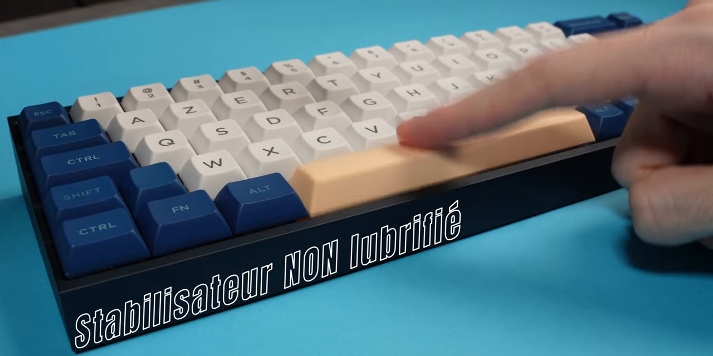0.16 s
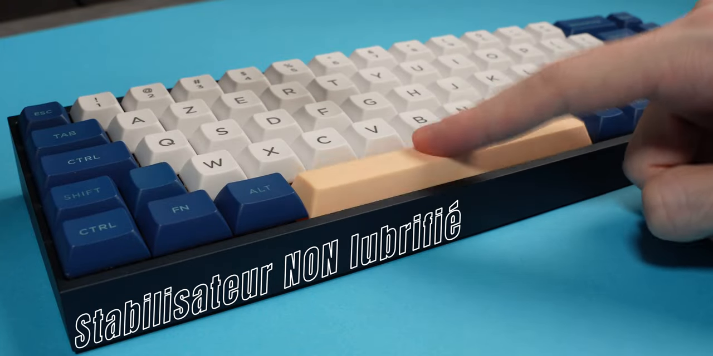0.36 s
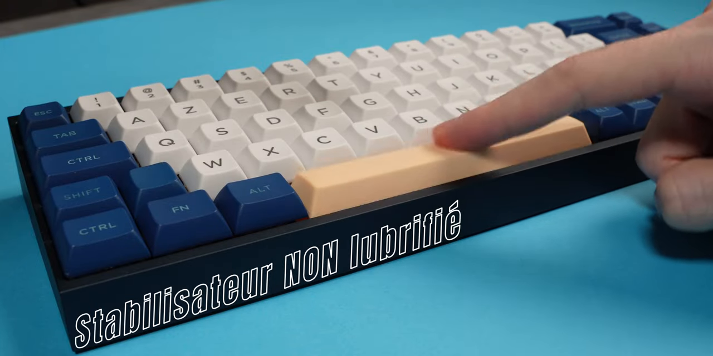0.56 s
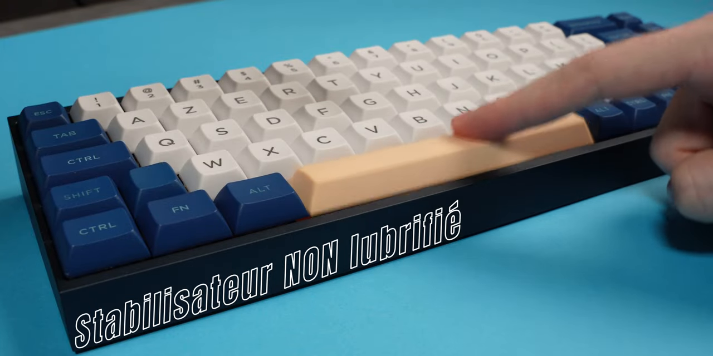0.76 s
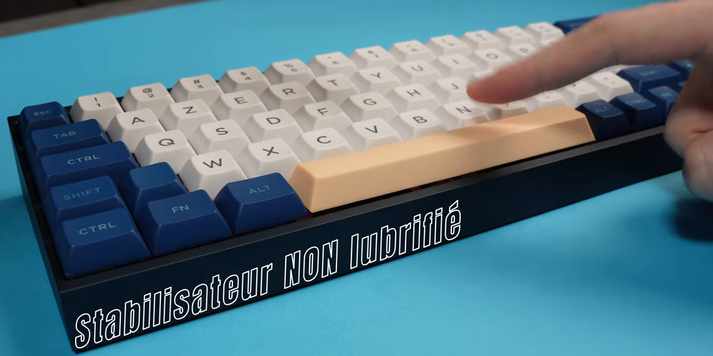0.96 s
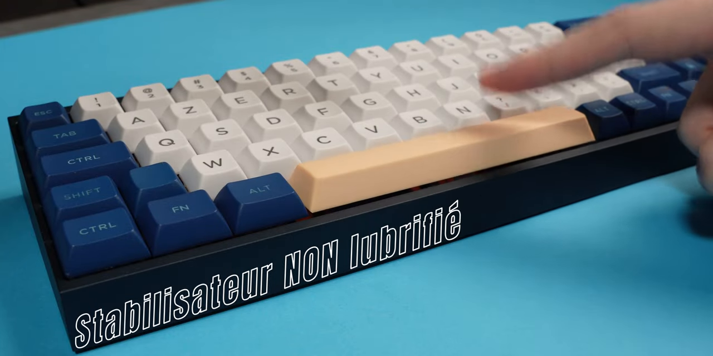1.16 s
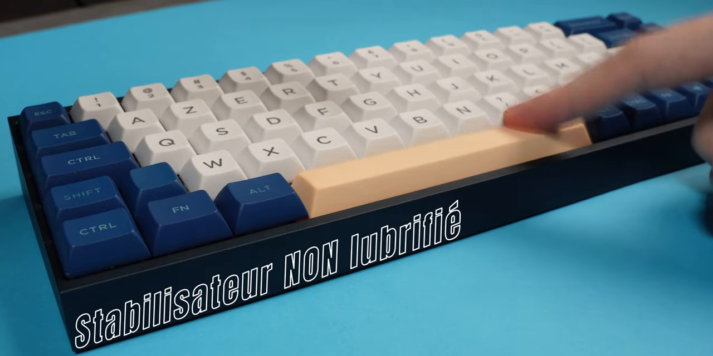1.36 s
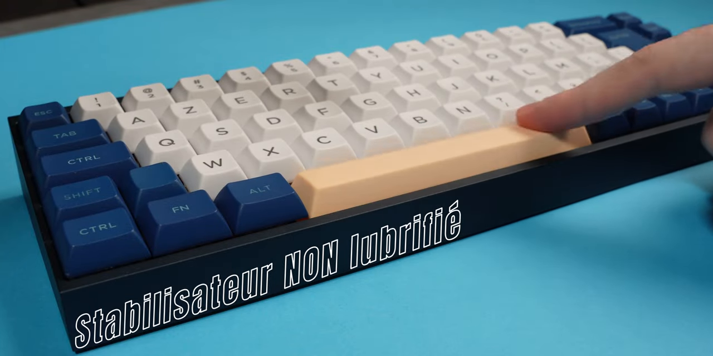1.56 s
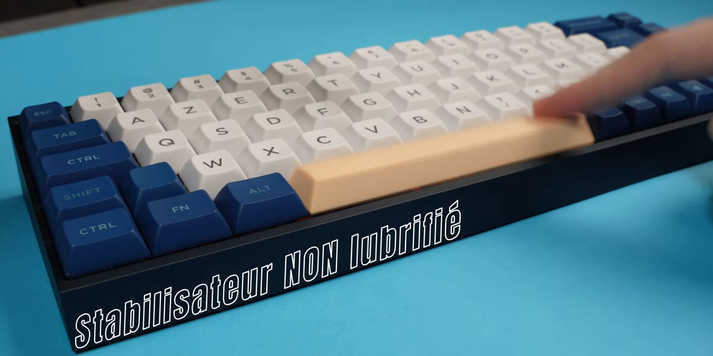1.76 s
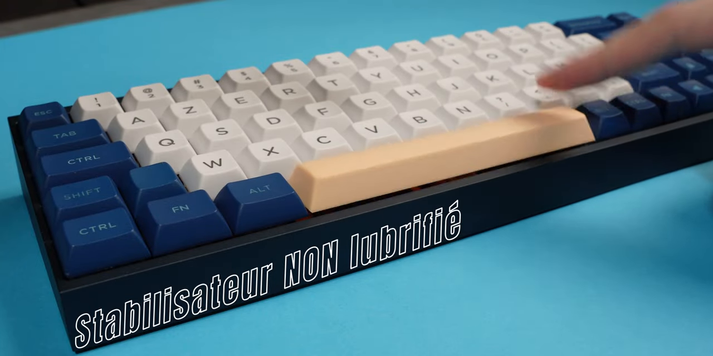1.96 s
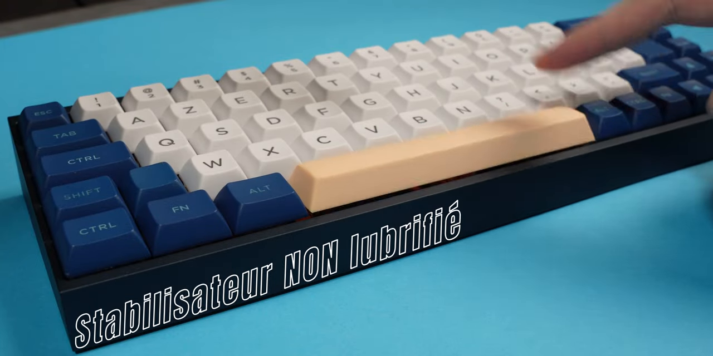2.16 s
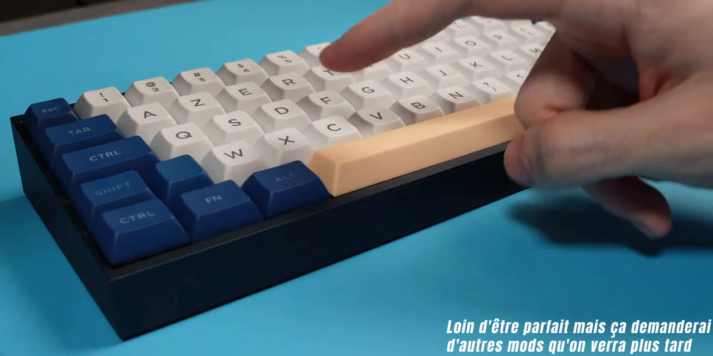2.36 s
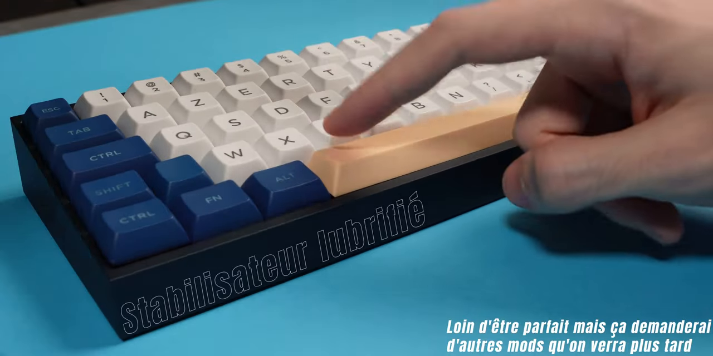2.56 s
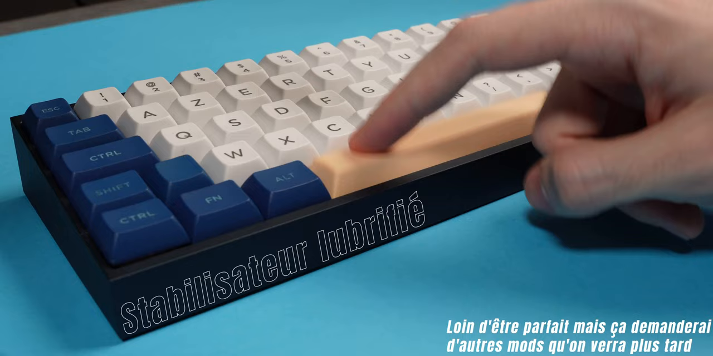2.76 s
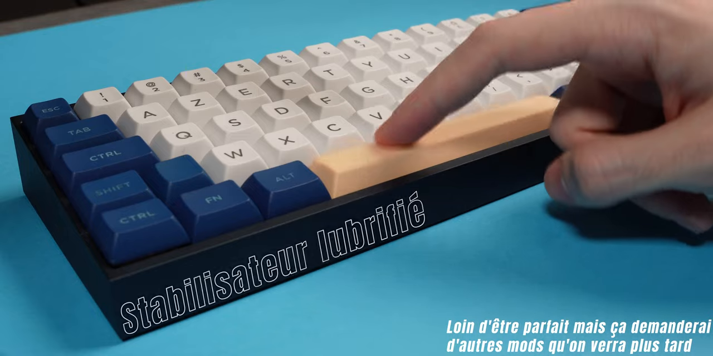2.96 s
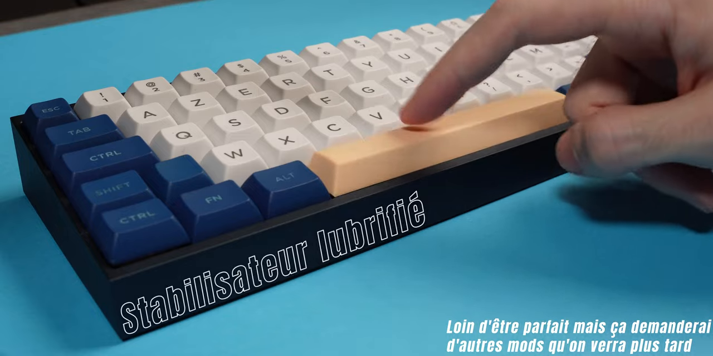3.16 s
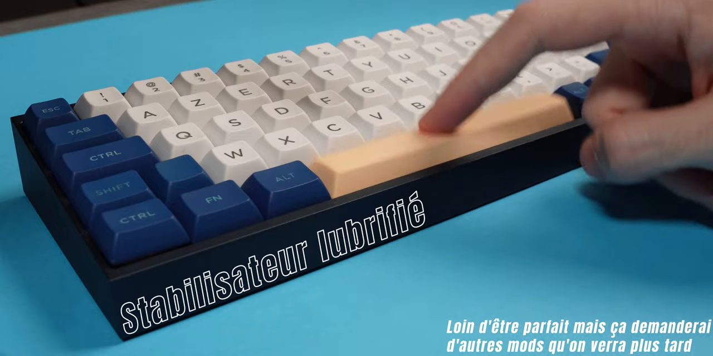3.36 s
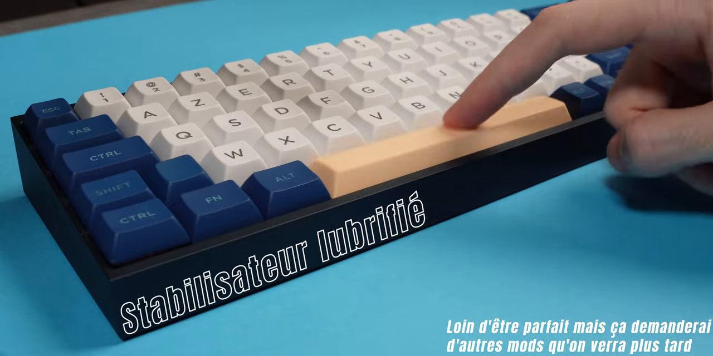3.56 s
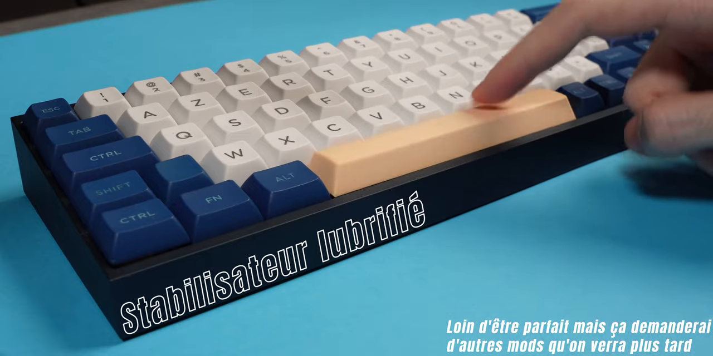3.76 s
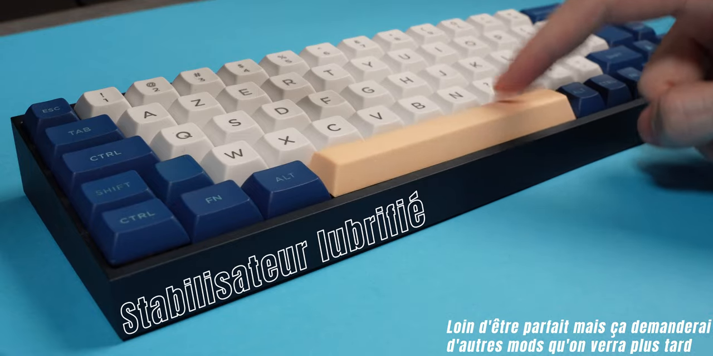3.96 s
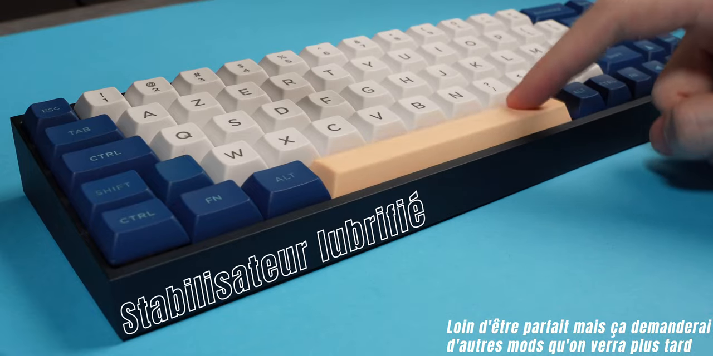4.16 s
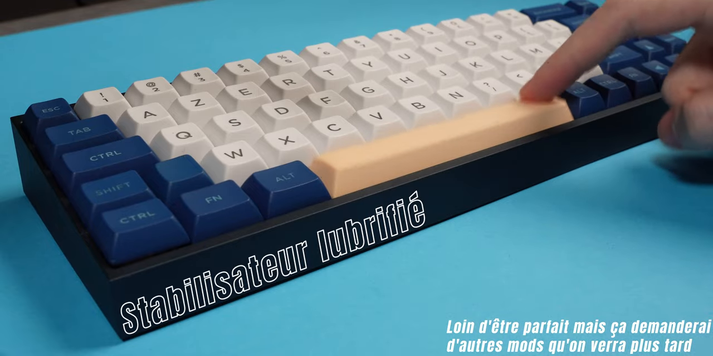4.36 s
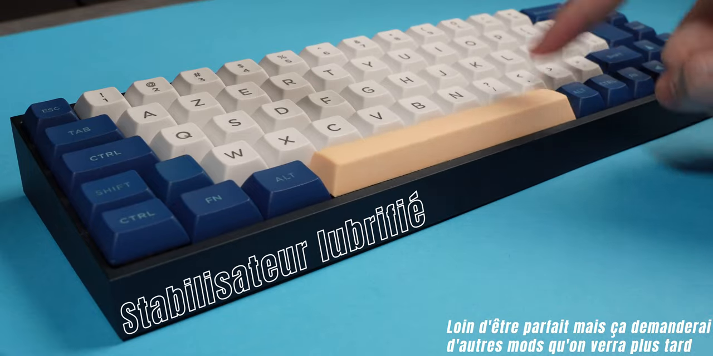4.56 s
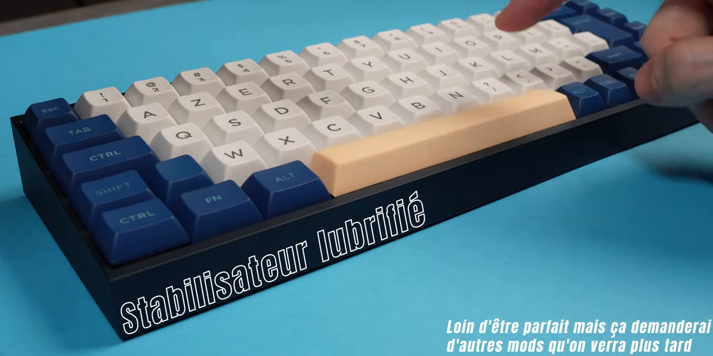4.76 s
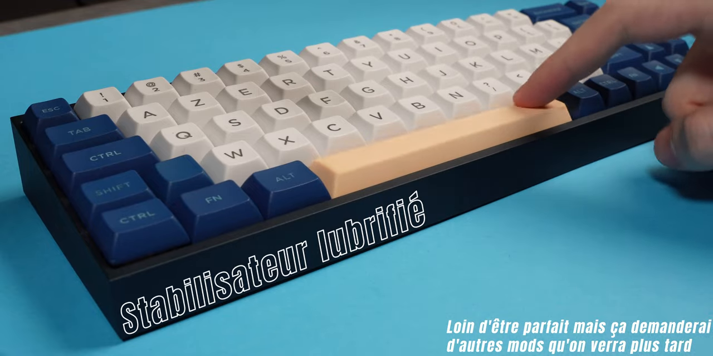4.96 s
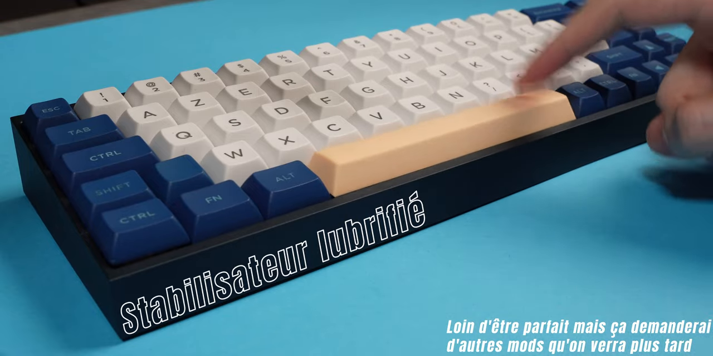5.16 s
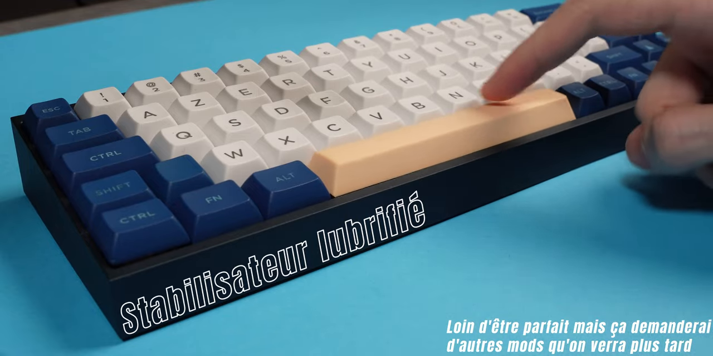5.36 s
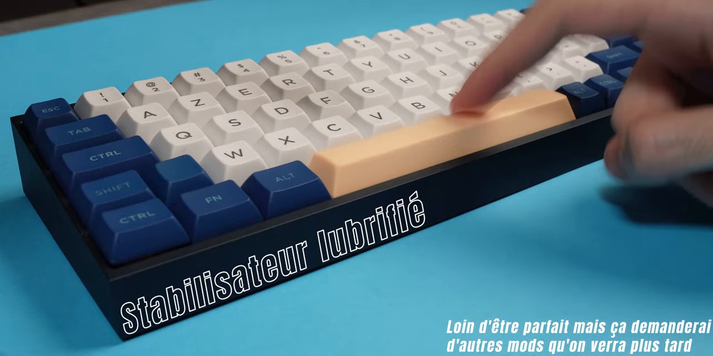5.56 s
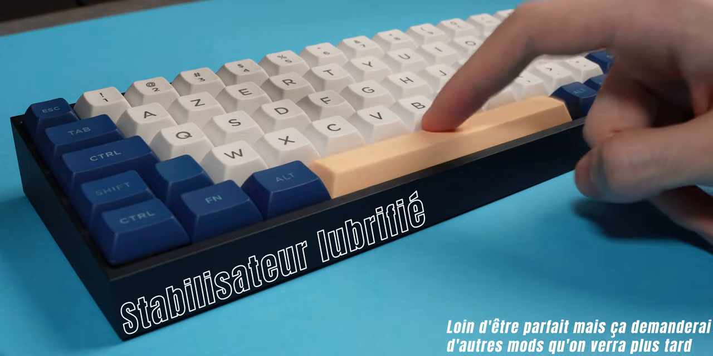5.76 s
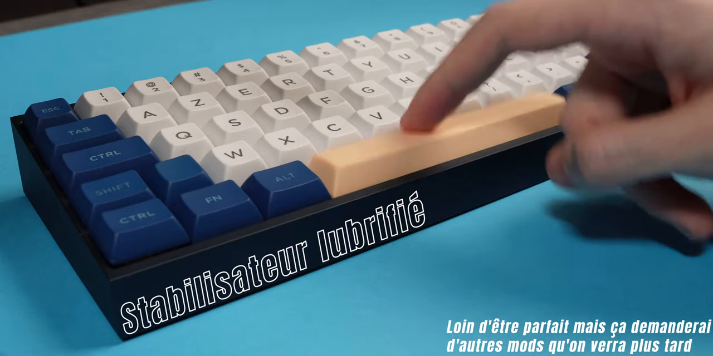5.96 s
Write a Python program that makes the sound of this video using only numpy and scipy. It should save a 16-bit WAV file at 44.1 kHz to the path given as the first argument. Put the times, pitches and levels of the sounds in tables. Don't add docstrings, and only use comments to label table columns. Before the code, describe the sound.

Close microphone in a small quiet room: one finger repeatedly taps the long space bar of a mechanical keyboard on a desk. Each stroke is a knock at the bottom and a clack on the way back. The first run has a dry metallic rattle from a loose wire; after a brief pause, a second run sounds softer and rounder, with a tiny rebound tick. One short rest interrupts it.

```python
import sys
import numpy as np
from scipy import signal
from scipy.fft import rfft, irfft
from scipy.io import wavfile

SR = 44100
rng = np.random.default_rng(int(sys.argv[2]) if len(sys.argv) > 2 else 0)


def materialize(psi):
    bounded = np.clip(np.atleast_2d(psi).T, -1, 1)
    quanta = np.round(bounded * 32767).astype(np.int16)
    wavfile.write(sys.argv[1], SR, quanta)


def to_linear_factor(level_db):
    exponent = np.asarray(level_db, float) / 20
    return 10 ** exponent


N = 265482

GREASED_FROM_S = 2.4

# f/Hz, level/dB per Hz
ROOM_TONE = [(53, -22.5), (90, -2), (185, -11), (211, -14), (245, -13.5), (333, -16), (655, -22.5),
             (1060, -32), (2820, -39), (15100, -52.5), (16500, -61.5)]
# t/s, level/dB
DESK_JOLTS = [
    (0.0, -41),
    (0.18, -44.5),
    (0.86, -46),
    (1.851, -45.5),
    (2.441, -42.5),
    (3.44, -45),
    (4.43, -51),
    (5.45, -39.5),
]
# t/s, length/ms, level/dB, swell/dB
BAND_NOISES = [
    (0.0, 23.2, -34.5, -16.5),
    (0.142, 32, -67, -1),
    (1.017, 28.0, -53, -12.5),
    (1.527, 26.0, -54.5, -11.5),
    (3.163, 35, -58, 24.5),
]
# f/Hz, level/dB
BAND_NOISE_ZONES = [
    [(1250, 4), (2100, 5), (3000, -7.5), (3900, 1), (4650, -12.5), (5700, -2.5), (6600, -7.5),
     (10900, -5.5), (12900, -12)],
    [(2300, 14.5), (4000, 13), (5300, -1), (6700, -14.5), (10700, -14.5)],
    [(3000, -1.5), (4000, 0), (5200, -7), (6000, -7), (6800, -1), (10900, -10)],
    [(2400, 2.5), (4000, 1), (5100, 0), (6000, -0.5), (6700, -3), (10900, -4.5), (14800, -6)],
    [(1550, 1), (2400, 2), (3800, -7), (5700, -2), (6550, -5), (9500, -8.5)],
]
# t/s, level/dB, centre f/Hz
FINGER_TAPS = [(0.0737, -20, 5730), (0.2422, -20, 3300), (0.5851, -50, 5400), (0.7613, -30.5, 4200),
               (1.42, -40.5, 5500), (2.5025, -19, 6400), (2.659, -23, 3850), (2.8092, -25, 3600),
               (2.961, -26, 3700), (3.0924, -42, 3110), (3.2464, -29, 3960), (3.409, -33.5, 3400),
               (3.735, -38, 2200), (3.867, -38.5, 3000), (4.04, -35, 2200), (4.183, -45, 2500),
               (4.3444, -36.5, 3600), (5.125, -44, 5500), (1.259, -39.5, 6000), (1.753, -41, 6500),
               (1.983, -47, 8130), (4.49, -37.5, 4400), (4.9903, -27, 4900), (5.3097, -26, 4500),
               (5.6282, -29.5, 2610), (5.798, -26, 4500), (5.9464, -21.5, 6200)]
# t/s, level/dB, length/ms
BAR_ROCKS = [
    (0.075, -52.5, 14.4),
    (0.2398, -48.5, 16),
    (0.29, -61, 53),
    (0.4165, -48, 7.6),
    (0.4264, -44, 5),
    (0.452, -59, 14),
    (0.579, -62, 33),
    (2.5, -55, 7.6),
]
# t/s, peak level/dB, brightness/dB, wire rattle/dB
DRY_PRESSES = [(0.1001, -15, -3.5, -26), (0.263, -11, -7, -9), (0.435, -10, -8, -12),
               (0.605, -12.5, -8, -37), (0.7734, -15, -5, -23.5), (0.9346, -8, -4, -25),
               (1.1045, -9, -4.5, -36.5), (1.2765, -8.5, -4, -31), (1.4349, -3.5, -4, -50.5),
               (1.6071, -7, -5, -32.5), (1.7703, -8, -4.5, -28), (1.937, -7.5, -5.5, -31.5),
               (2.0926, -5, -3.5, -32.5)]
# t/s, peak level/dB, brightness/dB, wire rattle/dB
GREASED_PRESSES = [(2.5173, -6.5, -7, -25), (2.6829, -7, -7.5, -27), (2.8352, -7, -7.5, -25),
                   (2.9907, -9.5, -7, -22), (3.1334, -7.5, -7.5, -34), (3.277, -9, -7, -25),
                   (3.4319, -10, -7.5, -22), (3.5996, -10, -9, -32), (3.7538, -9.5, -5.5, -18),
                   (3.9034, -10, -7.5, -20.5), (4.0696, -16, -11.5, -26), (4.2187, -7.5, -9, -26),
                   (4.3675, -7, -8, -20), (4.5082, -4, -7.5, -25), (5.0139, -13, -11, -24),
                   (5.1587, -8, -9.5, -28), (5.3276, -9, -7, -19), (5.4883, -8.5, -7.5, -32),
                   (5.6466, -10.5, -10, -37), (5.82, -9, -9, -26), (5.971, -9, -8, -36)]
# t/s, peak level/dB, wire rattle/dB, rattle length/ms, weight of low modes/dB
DRY_RETURNS = [(0.1642, -12, -8, 5.6, -11), (0.334, -10.5, -13, 8.3, -24), (0.5065, -11.5, -12, 5.9, -13),
               (0.6684, -12.5, -6.5, 5.8, -3), (0.851, -17.5, -4.5, 3.2, 5), (0.9996, -10.5, -6, 4.2, -5),
               (1.1684, -10.5, -11.5, 7.4, -6), (1.3372, -10, -8.5, 7.1, 1.5), (1.5094, -11, -13, 7.3, -2),
               (1.681, -11, -12, 5.5, -4), (1.8433, -12, -6, 7.4, 1.5), (2.0074, -11, -7.5, 5.4, -2),
               (2.174, -10.5, -10.5, 6.4, -1)]
# t/s, peak level/dB, wire rattle/dB, rattle length/ms, rebound tick/dB
GREASED_RETURNS = [(2.592, -16.5, -12.5, 8.8, -32), (2.751, -12.5, -34, 8.6, -26),
                   (2.8993, -14, -11, 10, -32), (3.0501, -18.5, -21, 6.7, -57),
                   (3.1897, -16.5, -9.5, 9, -57), (3.3363, -13, -10.5, 8.2, -29),
                   (3.4976, -12.5, -12, 6.4, -48), (3.65, -13, -9, 7, -26), (3.8102, -20, -1, 5, -27),
                   (3.9602, -15.5, 0, 6.9, -28), (4.1255, -19, -1, 4.7, -53), (4.2704, -14, -3.5, 6.2, -25),
                   (4.4402, -17.5, -2.5, 3.7, -29), (4.5776, -11, -15, 10.5, -49.5),
                   (5.078, -19, 0, 3.4, -29), (5.2135, -8, -18, 8.3, -26), (5.3973, -16.5, -13, 5.9, -24),
                   (5.5341, -11, -7, 7.7, -50), (5.6983, -14, -26, 6.6, -55), (5.882, -14.5, -16, 6.9, -32)]
# brightness/dB, rattle dullness/dB per octave, slack noise/dB
DRY_RETURN_COLOUR = [(2.5, -1.5, -58), (2.5, 0, -54.5), (-5, -1.5, -53.5), (3.5, 0, -60), (-1.5, -2.5, -69),
                     (3, -2, -52), (-2.5, -1, -57), (-2.5, 0.5, -60), (3, -1.5, -51.5), (-1, 3.5, -58),
                     (2, -1, -53), (-3, -1.5, -52.5), (-3, 1, -72.5)]
# brightness/dB, rattle dullness/dB per octave, low modes/dB
GREASED_RETURN_COLOUR = [(2.5, 4, 0), (-2, 0, 0), (0.5, 4, 1), (-1, 6, 2), (-2, 5, 4), (0, 2.5, 5),
                         (-7, 10, 6), (1.5, 4, 2), (5.5, 2, 5), (1.5, 6, -2), (4, 0.5, 6), (2.5, 5, -12),
                         (-1, 1, -2), (-3, 2.5, 0), (0, 1, 3), (-6, 1.5, -2.5), (1, 5, 3), (-0.5, 3.5, 4.5),
                         (-6, -1, 4.5), (-5, 10.5, 5.5)]
REBOUND_DELAY_MS = [25, 23, 23.5, 23, 23, 23.5, 23, 21.5, 21.5, 22, 23, 23, 22, 23, 21.3, 21.5, 21, 23, 23,
                    21]
# t/s, level/dB, length/ms
WIRE_SLAPS = [(0.1685, -60, 2.4), (0.174, -42, 2.0), (0.3415, -48, 2.7), (0.513, -45, 4.2),
              (0.677, -44, 3.5), (0.856, -51, 2.3), (1.0082, -38, 2.8), (1.176, -49, 2.0),
              (1.179, -47, 2.0), (1.3485, -48, 3.0), (1.5137, -50, 1.5), (1.5195, -62, 1.7),
              (1.5212, -41.5, 2.5), (1.686, -46.5, 4.4), (1.853, -56, 3.4), (2.0132, -44, 3.2),
              (2.179, -53.5, 3.5), (2.758, -60.5, 2.0), (2.9083, -56, 3.6), (3.057, -46, 1.5),
              (3.198, -64, 2.0), (3.506, -60, 2.0), (3.656, -66, 2.1), (3.663, -67, 2.0), (3.818, -56, 2.5),
              (3.965, -59, 2.0), (3.9696, -60, 1.8), (4.2765, -59, 2.5), (4.5865, -50, 2.05),
              (5.224, -65, 2.5), (5.403, -58, 2.0), (5.889, -62, 3.6)]
# t/s, level/dB
STRAY_KNOCKS = [(0.254, -32), (0.2649, -40), (0.343, -35), (0.4675, -40), (0.7535, -30), (1.173, -17),
                (1.5154, -34), (1.6304, -32.5), (1.823, -31), (2.1423, -40), (3.0572, -21), (3.1405, -29),
                (3.504, -24), (3.659, -17), (3.8206, -38), (4.5833, -14), (4.5944, -24.5), (4.6176, -28.5),
                (5.0622, -26), (5.5733, -29), (5.685, -38), (5.955, -26)]
# f/Hz, t60/s, level/dB
WIRE_MODES = [(1106, 0.019, -3.5), (1540, 0.0051, 2), (2100, 0.0071, 2), (2500, 0.0014, 8),
              (3600, 0.003, 0), (4500, 0.0012, 3.5), (5500, 0.016, -19), (5480, 0.0076, -6.5),
              (6670, .009, -11), (9100, 0.00094, 2.5), (11000, 0.0029, -0.5), (13050, 0.015, -18.5),
              (13400, 0.007, -20.5), (14800, .005, -20)]
# f/Hz, t60/s, level/dB dry down, dry up, greased down, greased up
DESK_MODES = [(37.4, 0.054, -3, 3.5, -9.5, 4.5), (64.6, 0.086, -4, -3, -8.5, 0.5),
              (97, 0.079, -18.5, -1.5, -11.5, -22)]
# f/Hz, t60/s, level/dB dry down, dry up, greased down, greased up
CASE_MODES = [(178, 0.03, -0.5, -1.5, -47.5, -25), (290, 0.038, -2.5, -14, -0.5, -2.5),
              (343, 0.013, 4.5, -24, 4.5, 7.5), (476, 0.033, -3, -6.5, -8.5, 1),
              (568, 0.073, -23.5, -20, -18.5, -17), (598, 0.11, -16, -18, -14.5, -10),
              (590, 0.034, -21, -8.5, -11, -3), (698, 0.04, -12.5, -20.5, -16.5, -14.5)]
# f/Hz, t60/s, level/dB dry down, dry up, greased down, greased up
KEY_MODES = [(860, 0.016, -22.5, -1.5, -42.5, -13.5), (927, 0.036, -25.5, 3.5, -34, -17.5),
             (1180, 0.04, -25, -10, -30.5, -5), (1350, 0.01, 5, -0.5, -48.5, -28),
             (1537, 0.03, -7, -7.5, 0, -8.5), (1632, 0.02, -17, -10, -1.5, -9),
             (1726, 0.023, -8.5, -7, 1, -6), (1877, 0.018, 0, -7, -21.5, -4),
             (1962, 0.014, -4.5, -14, -2, -16.5), (2050, 0.025, -25, -11, -9.5, -7),
             (2390, 0.016, -29.5, -20, -16.5, -6), (2660, 0.01, -25, -16.5, -45, -15.5),
             (3000, 0.0013, -8.5, -16, -49.5, -19.5), (3750, 0.008, -14.5, -14.5, -31, -30.5),
             (4400, 0.0011, -19.5, 7.5, -46, 7.5), (4970, 0.0081, -1, -6.5, 4, 2.5),
              (5314, 0.0091, 1, -12, 5, -13), (5680, 0.027, -19, -10.5, -20, -3),
              (6005, 0.03, -7, -7.5, -4.5, -1), (6660, 0.026, -21, -13, -20.5, -7),
              (6870, 0.0056, -22, -8.5, -51.5, -2.5), (8530, 0.0023, -7.5, -3.5, -1.5, -2),
              (9160, 0.0049, -14.5, -4, -12, 0.5), (10750, 0.004, -6.5, -1, -6, 2.5),
              (11900, 0.024, -19.5, -11.5, -16, -16.5), (13100, 0.012, -23, -12.5, -17, -6.5),
              (15100, .008, -26.5, -14.5, -16, -9.5)]
# f/Hz, t60/s of case, t60/s of room, level/dB
TAIL_BANDS = [(201, 0.17, 0.2, -3.5), (600, 0.12, 0.69, 2), (829, 0.068, 0.1, 4.5), (1630, 0.04, 0.27, 1.5),
              (3850, 0.049, 0.36, 3.5), (9200, 0.15, 0.036, -9.5), (15000, .04, .12, -14.5)]
# f/Hz, t60/s, level/dB
COIL_SPRINGS = [(4830, .22, -71), (4940, .18, -70), (5120, .12, -70)]

AIR_DB, RUMBLE_DB = -59, -54
JOLT_RISE_S, JOLT_FALL_S = 0.066, 0.028
SLIDE_DB = (-51, -52)
SLIDE_HOLD_S, SLIDE_FADE_DB_PER_S = 0.065, 104
ZONE_WIDTH_HZ = 520
SETTLE_S, SETTLE_DB = 0.0064, -8
SLIDER_LEAD_S, SLIDER_DB, SLIDER_HZ = 0.0049, -35, 3540
BOUNCE_S, BOUNCE_DB, BOUNCE_HZ = (0.013, 0.0153), (-33.5, -43), 3300
REBOUND_HZ = 3400
STRAY_HZ = 3700
TICK_FOCUS_DB = 7
SLAP_DULL_DB = -0.5
SLACK_LEAD_S, SLACK_MS = 0.0081, 5.5
HEAVY_BELOW_HZ, BRIGHT_ABOVE_HZ = 1300, 4000
PLASTIC_CYCLES, PLASTIC_T60_S = 140, 0.026
DOWN_THUD_DB, UP_THUD_DB, UP_BRIGHT_DB = (-19.5, -16.5), (-8.5, -13), (-3, -7)
THUD_PER_DB = -0.19


def rms_one(x):
    return x / np.sqrt(np.mean(x ** 2) + 1e-20)


def coloured(spectrum, size):
    hz = np.fft.rfftfreq(size, 1 / SR) + 1
    points = np.array(spectrum)
    shape = to_linear_factor(np.interp(np.log(hz), np.log(points[:, 0]), points[:, 1]))
    return rms_one(irfft(rfft(rng.standard_normal(size)) * shape, size))


def by_grease(s, pair):
    return np.where(s < GREASED_FROM_S, *pair)


def ring(clicks, hz, t60):
    r = to_linear_factor(-60 / (t60 * SR))
    w = 2 * np.pi * hz / SR
    return signal.lfilter([0, np.sin(w)], [1, -2 * r * np.cos(w), r * r], clicks + 1e-18)


def clicks_at(seconds, sizes):
    at = np.clip(np.round(np.asarray(seconds) * SR).astype(int), 0, N - 1)
    return np.bincount(at.ravel(), np.ravel(sizes), minlength=N)


def high_pass(x, hz, order):
    return signal.sosfilt(signal.butter(order, hz, "high", fs=SR, output="sos"), x)


def band_pass(x, low, high, order):
    return signal.sosfilt(signal.butter(order, [low, high], "band", fs=SR, output="sos"), x)


def room_tone():
    return to_linear_factor(AIR_DB) * coloured(ROOM_TONE, N)


def jolted():
    t = np.arange(N) / SR
    level = np.full(N, to_linear_factor(RUMBLE_DB))
    for s, db in DESK_JOLTS:
        level += to_linear_factor(db) * np.exp(np.minimum((t - s) / JOLT_RISE_S, (s - t) / JOLT_FALL_S))
    return level


def rumble():
    shape = [(8, -18.5), (28, 4.5), (60, -3.5), (110, -13.5), (200, -36.5), (400, -64.0)]
    return jolted() * coloured(shape, N)


def travel_db():
    t = np.arange(N) / SR
    strokes = DRY_PRESSES + DRY_RETURNS + GREASED_PRESSES + GREASED_RETURNS
    moved = np.sort([0] + [row[0] for row in strokes])
    since = t - moved[np.searchsorted(moved, t, "right") - 1]
    return by_grease(t, SLIDE_DB) - SLIDE_FADE_DB_PER_S * np.maximum(since - SLIDE_HOLD_S, 0)


def slide():
    shape = [(500, -20.5), (1000, 0.5), (1900, 0), (3000, -18.0),
             (5500, -8.5), (7500, -18.0), (11000, -17.0), (16000, -30.5)]
    return to_linear_factor(travel_db() - 9.5) * coloured(shape, N)


def band_noise():
    out = np.zeros(N)
    for (s, ms, db, swell_db), zones in zip(BAND_NOISES, BAND_NOISE_ZONES):
        size, start = round(ms / 1000 * SR), round(s * SR)
        shape = to_linear_factor(db + swell_db * np.arange(size) / size) * signal.windows.tukey(size, 0.2)
        for hz, zone_db in zones:
            noise = band_pass(rng.standard_normal(4000), hz - ZONE_WIDTH_HZ / 2, hz + ZONE_WIDTH_HZ / 2, 4)
            noise = rms_one(noise[1000:])
            out[start:start + size] += to_linear_factor(zone_db) * shape * noise[:size]
    return out


def ticks_table():
    tap_s, tap_db, tap_hz = np.transpose(FINGER_TAPS)
    stray_s, stray_db = np.transpose(STRAY_KNOCKS)
    down_s, down_db = np.transpose(DRY_PRESSES + GREASED_PRESSES)[:2]
    greased_down_s = np.transpose(GREASED_PRESSES)[0]
    greased_up = np.transpose(GREASED_RETURNS)
    rebound_s = greased_up[0] + np.array(REBOUND_DELAY_MS) / 1000
    bounce_s = down_s + by_grease(down_s, BOUNCE_S)
    bounce_db = down_db + by_grease(down_s, BOUNCE_DB)
    groups = [(tap_s, tap_db, tap_hz),
              (tap_s + SETTLE_S, tap_db + SETTLE_DB, tap_hz),
              (stray_s, stray_db, STRAY_HZ),
              (rebound_s, greased_up[4], REBOUND_HZ),
              (greased_down_s - SLIDER_LEAD_S, SLIDER_DB, SLIDER_HZ),
              (bounce_s, bounce_db, BOUNCE_HZ)]
    return np.concatenate([np.transpose(np.broadcast_arrays(*group)) for group in groups])


def tick_clicks(s, db, centre_hz, hz):
    near_db = -TICK_FOCUS_DB * np.log2(hz / centre_hz) ** 2
    fading_db = np.array([0.5, -21.0, -2.0, -2.0])
    luck = rng.choice([-1, 1], s.shape) * to_linear_factor(rng.standard_normal(s.shape))
    return clicks_at(s, to_linear_factor(db - 9.5 + fading_db + near_db) * luck)


def shaken(seconds, level_db, length_ms, rise, edge):
    out = np.zeros(N)
    for s, db, ms in np.broadcast(seconds, level_db, length_ms):
        t = np.arange(round(0.09 * SR)) / SR / (ms / 1000)
        start = round(s * SR)
        swell = np.minimum(rise * t, 1) * np.exp(-t ** edge)
        out[start:start + len(t)] += (to_linear_factor(db) * swell)[:N - start]
    return out


def rocking():
    back = np.transpose(DRY_RETURNS + GREASED_RETURNS)[0]
    slack_db = np.transpose(DRY_RETURN_COLOUR + GREASED_RETURN_COLOUR)[2]
    out = shaken(*np.transpose(BAR_ROCKS), rise=17.0, edge=1.8)
    slack_db = by_grease(back, (slack_db, -99))
    return out + shaken(back - SLACK_LEAD_S, slack_db, SLACK_MS, rise=1.8, edge=8.0)


def chatter():
    s, peak_db, _, rattle_db = np.transpose(DRY_PRESSES + GREASED_PRESSES)
    back, back_db, shake_db, ms, _ = np.transpose(DRY_RETURNS + GREASED_RETURNS)
    bottom = shaken(s, peak_db + rattle_db - 20.0, 6.5, rise=6.0, edge=0.98)
    leaf = shaken(s - 0.0042, peak_db - 58.5, 2.3, rise=8.0, edge=3.6)
    top = shaken(back, back_db + shake_db - 22.5, 1.6 * ms, rise=1.1, edge=2.4)
    return bottom + leaf + top


def dullness():
    back = np.transpose(DRY_RETURNS + GREASED_RETURNS)[0]
    dull_db = np.transpose(DRY_RETURN_COLOUR + GREASED_RETURN_COLOUR)[1]
    latest = np.searchsorted(back - 0.01, np.arange(N) / SR) - 1
    return dull_db[np.clip(latest, 0, None)]


def wire():
    s, db, centre_hz = np.transpose(ticks_table())[:, :, None]
    burst = s + np.array([0, 0.0006, 0.0014, 0.0026]) * rng.uniform(0.39, 1.4, (len(s), 4))
    contacts_per_s = 3500
    contact = rng.random(N) < contacts_per_s / SR
    sizes = rms_one(to_linear_factor(3.0 * np.minimum(rng.exponential(1, N), 4)) * contact)
    rattling, dull_db, rocks = chatter(), dullness(), rocking()
    slaps = shaken(*np.transpose(WIRE_SLAPS), rise=3.3, edge=0.75)
    out = np.zeros(N)
    for hz, t60, mode_db in WIRE_MODES:
        octaves = np.log2(hz / 2500)
        shake = rattling * to_linear_factor(-dull_db * octaves)
        shake += slaps * to_linear_factor(-SLAP_DULL_DB * octaves)
        shake += rocks * to_linear_factor(-octaves)
        clicks = sizes * shake * rng.standard_normal(N) + tick_clicks(burst, db, centre_hz, hz)
        out += to_linear_factor(mode_db) * ring(clicks, hz, min(t60, PLASTIC_T60_S / 2))
    return high_pass(out, 1200.0, order=2)


def struck(modes, column, s, level_db, scatter_db):
    out = np.zeros(N)
    for k, mode in enumerate(modes):
        mode_db = by_grease(s, (mode[column], mode[column + 2]))
        size = to_linear_factor(level_db(mode[0]) + mode_db + scatter_db * rng.standard_normal(s.shape))
        together = HEAVY_BELOW_HZ < mode[0] < BRIGHT_ABOVE_HZ
        sign = 1 if together else (-1) ** k
        out += sign * ring(clicks_at(s, size), *mode[:2])
    return out


def seated(seconds, free_s, damp_db):
    t = np.arange(N) / SR
    since = t - seconds[np.clip(np.searchsorted(seconds, t) - 1, 0, None)]
    return to_linear_factor(-damp_db * np.clip((since - free_s) / 0.00059, 0, 1))


def plastic_modes():
    modes = []
    for hz, t60, *db in KEY_MODES:
        longest = PLASTIC_T60_S * (2 if hz < HEAVY_BELOW_HZ else 1)
        modes.append((hz, min(t60, longest, PLASTIC_CYCLES / hz), *db))
    return modes


def stroke_rows(s, peak_db, bright_db, weight_db, thud_db):
    thud = by_grease(s, thud_db) + THUD_PER_DB * (peak_db + 10.5)
    return np.transpose([s, peak_db, bright_db, weight_db, thud])


def knocks(rows, column, contacts, body_db, bright_db, thud_db, scatter_db, low_hz, free_s, damp_db):
    s, peak_db, bright, weight, thud = np.transpose(rows)[:, :, None]
    delay, contact_db = np.transpose(contacts)
    at = s + delay * rng.uniform(0.64, 1.3, (len(s), len(delay)))

    def blow_db(hz):
        light = (weight - 30 * (delay > 0)) * (hz < HEAVY_BELOW_HZ)
        return peak_db + body_db + contact_db + light + (bright + bright_db) * (hz > BRIGHT_ABOVE_HZ)

    bar = struck(plastic_modes(), column, at, blow_db, scatter_db)
    bar *= seated(s[:, 0], free_s, damp_db)
    case = struck(CASE_MODES, column, s + 0.0012, lambda hz: peak_db + thud + thud_db, 1.0)
    desk = struck(DESK_MODES, column, s + 0.00084, lambda hz: peak_db - 25.5, 3.7)
    desk = signal.sosfilt(signal.butter(2, 130.0, fs=SR, output="sos"), desk)
    return high_pass(bar, low_hz, order=4) + high_pass(case, 170.0, order=2) + desk


def presses():
    s, peak_db, bright_db, _ = np.transpose(DRY_PRESSES + GREASED_PRESSES)
    rows = stroke_rows(s, peak_db, bright_db, 0 * s, DOWN_THUD_DB)
    return knocks(rows, column=2, contacts=[(0.00082, -0.24), (0.0027, -10)],
                  body_db=-8.0, bright_db=-0.5, thud_db=-1.5, scatter_db=1.4,
                  low_hz=1443.0, free_s=0.012, damp_db=5.0)


def returns():
    s, peak_db, _, _, dry_weight_db = np.transpose(DRY_RETURNS + GREASED_RETURNS)
    shine_db, _, greased_weight_db = np.transpose(DRY_RETURN_COLOUR + GREASED_RETURN_COLOUR)
    bright_db = by_grease(s, UP_BRIGHT_DB) + shine_db
    weight_db = by_grease(s, (dry_weight_db, greased_weight_db))
    rows = stroke_rows(s, peak_db, bright_db, weight_db, UP_THUD_DB)
    return knocks(rows, column=3, contacts=[(0, -4), (0.0010, -1.5), (0.002, -2.5), (0.004, -8)],
                  body_db=-8.5, bright_db=0.5, thud_db=-5.5, scatter_db=2.5,
                  low_hz=656.0, free_s=0.0053, damp_db=4.5)


def tail(x, case_db, room_db):
    size = round(0.5 * SR)
    t, table = np.arange(size) / SR, np.array(TAIL_BANDS)
    answer = np.zeros(size)
    edges = 100 * 2 ** np.arange(0, 7.6, 0.5)
    for low, high in zip(edges, edges[1:]):
        case_s, room_s, db = (np.interp(np.log(low * 1.27), np.log(table[:, 0]), c) for c in table.T[1:])
        band = band_pass(rng.standard_normal(size), low, high, 2)
        case = to_linear_factor(db + case_db - 60 * t / case_s)
        room = to_linear_factor(db + room_db - 60 * t / room_s)
        answer += band * (case + room)
    answer *= np.clip((t - 0.002) / 0.0017, 0, 1)
    return signal.fftconvolve(x, answer)[:N]


def springs(x):
    return sum(to_linear_factor(db) * ring(x, hz, t60) for hz, t60, db in COIL_SPRINGS)


def scene():
    background = room_tone() + rumble() + slide()
    keys = band_noise() + wire() + presses() + returns()
    wet = tail(keys, case_db=-40.5, room_db=-52.0) + springs(keys)
    return (background + keys + wet)[None]


def band_limit(x):
    return signal.sosfilt(signal.butter(12, 16980, fs=SR, output="sos"), x)


def record(dry):
    cut = signal.sosfilt(signal.cheby2(12, 70, 17500, fs=SR, output="sos"), dry)
    return band_limit(cut)


dry = scene()
out = record(dry)
materialize(out)
```